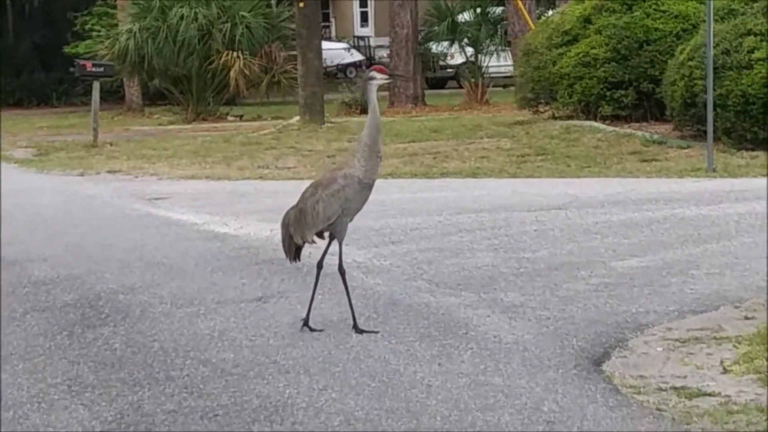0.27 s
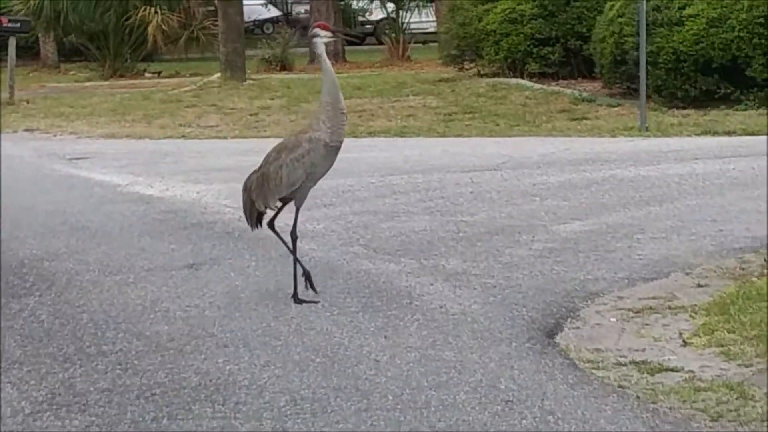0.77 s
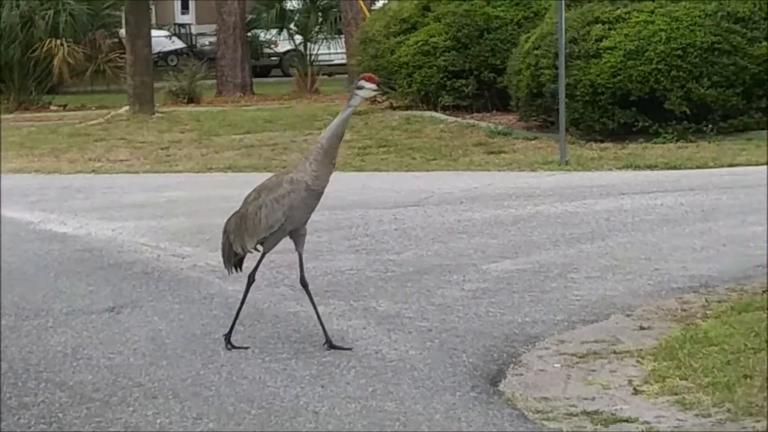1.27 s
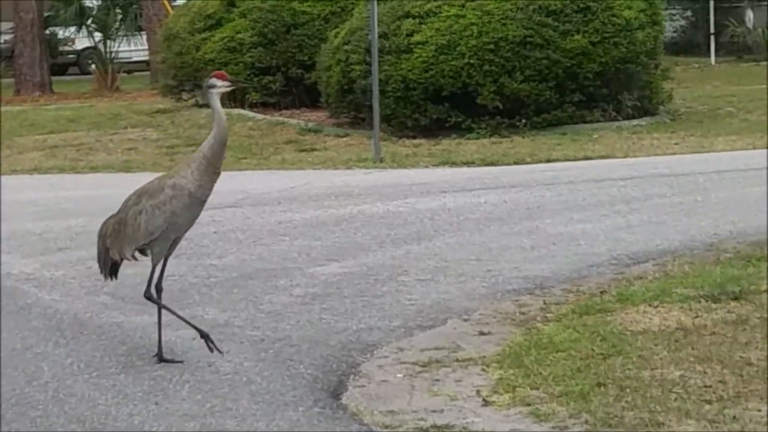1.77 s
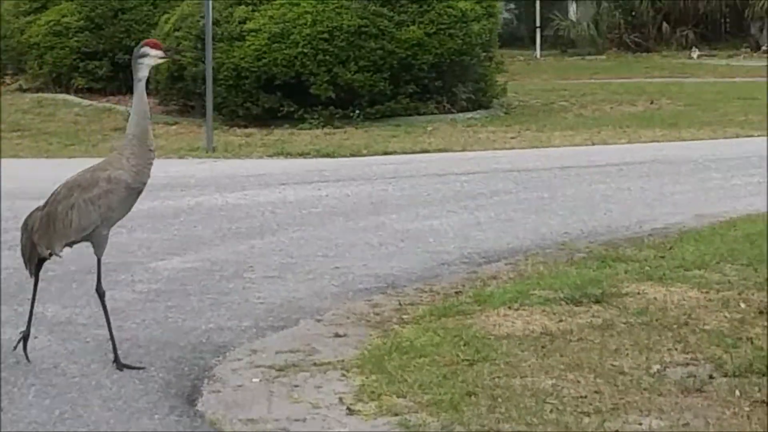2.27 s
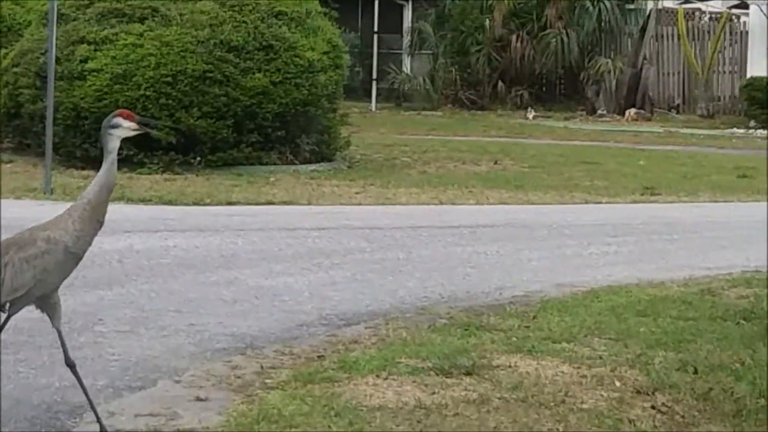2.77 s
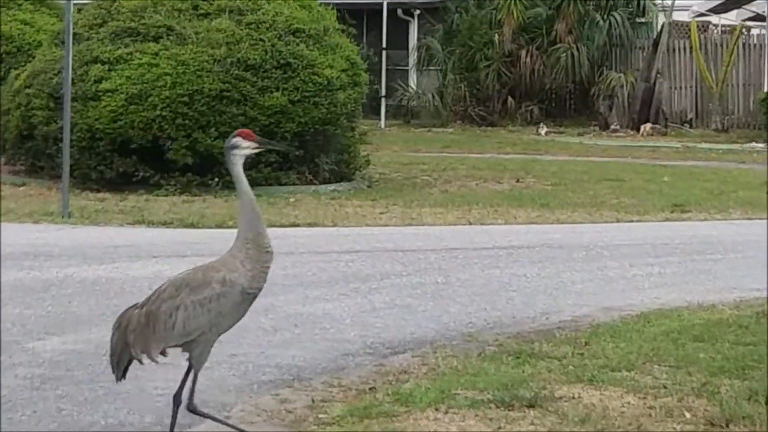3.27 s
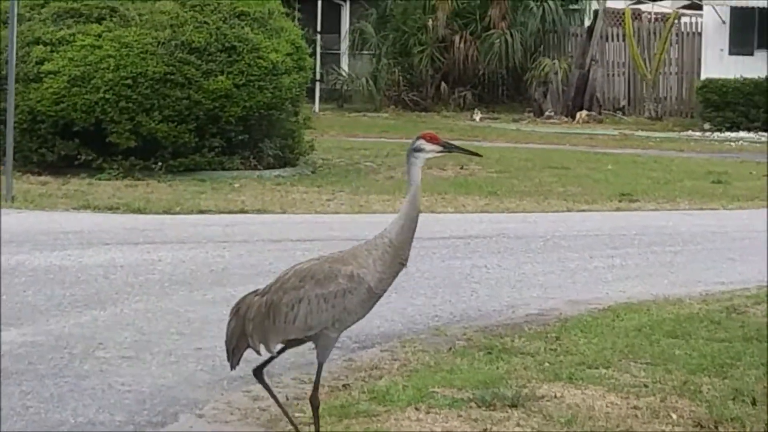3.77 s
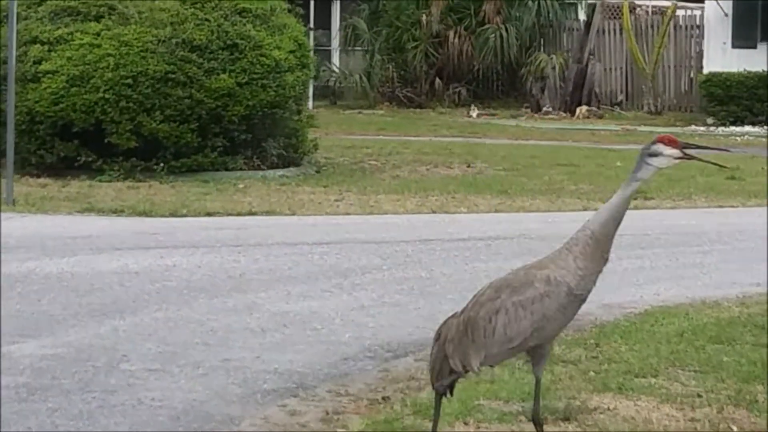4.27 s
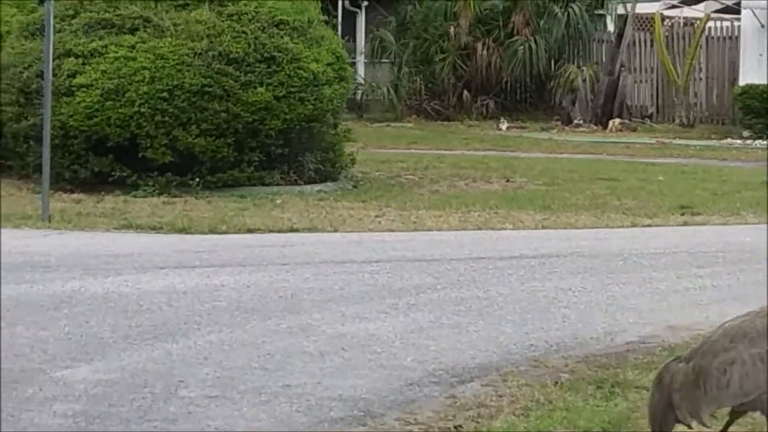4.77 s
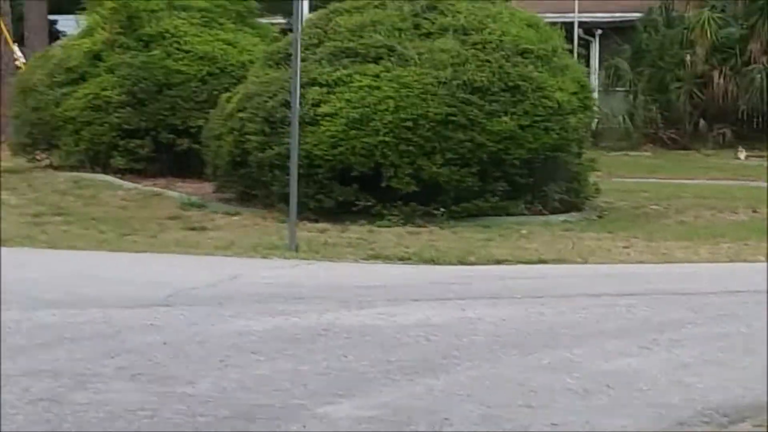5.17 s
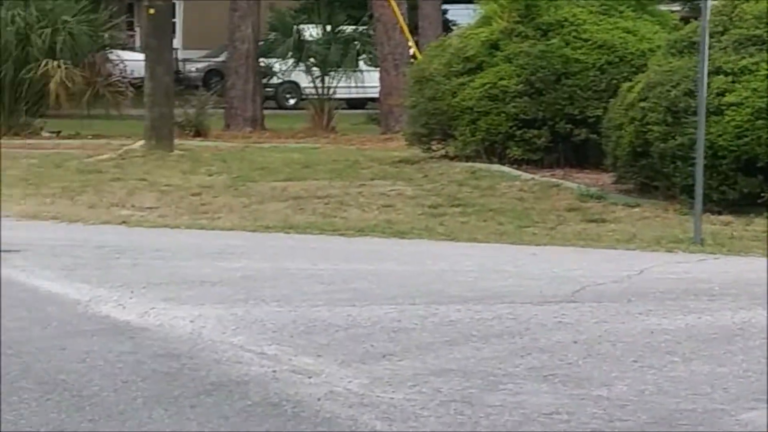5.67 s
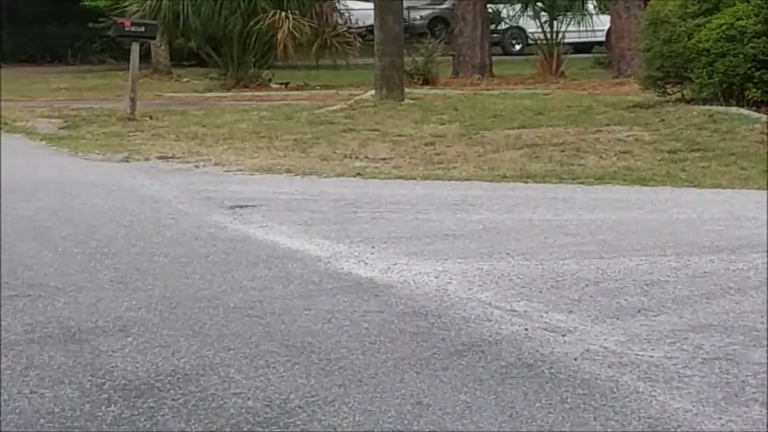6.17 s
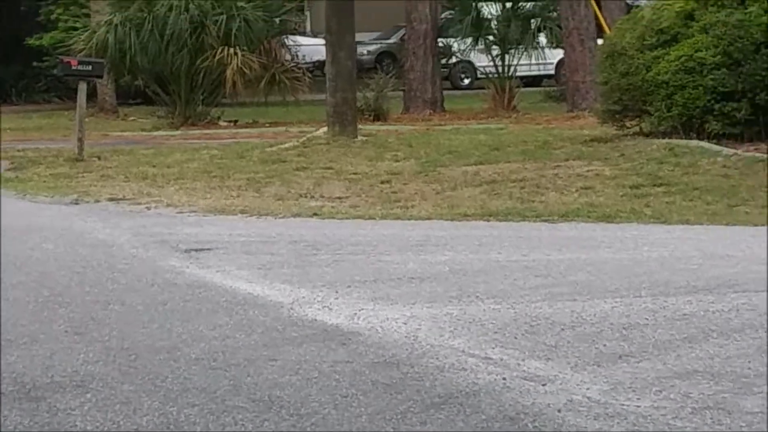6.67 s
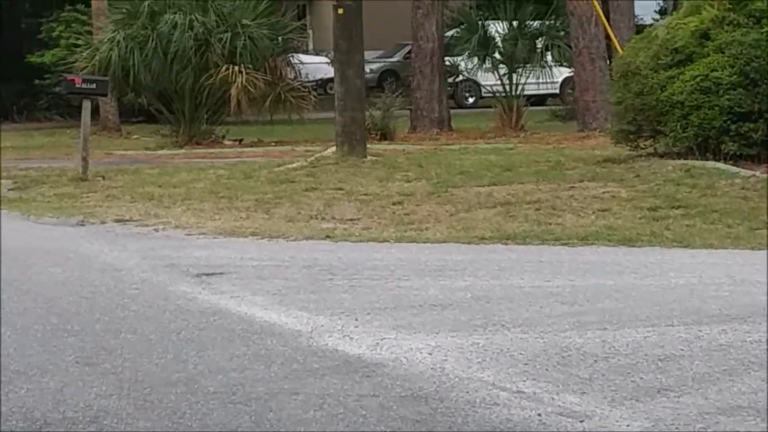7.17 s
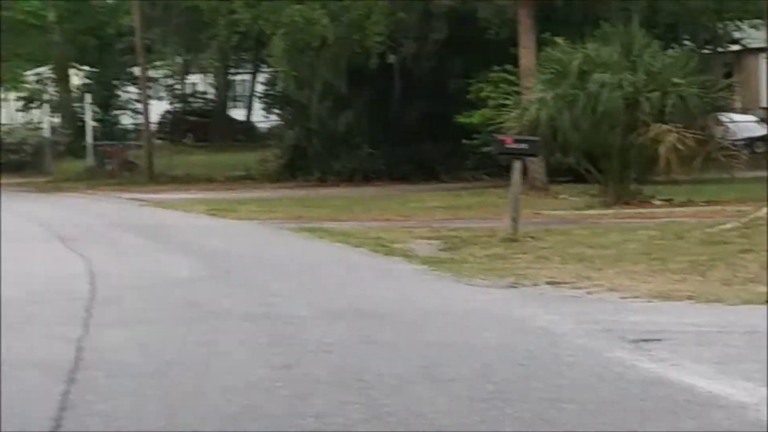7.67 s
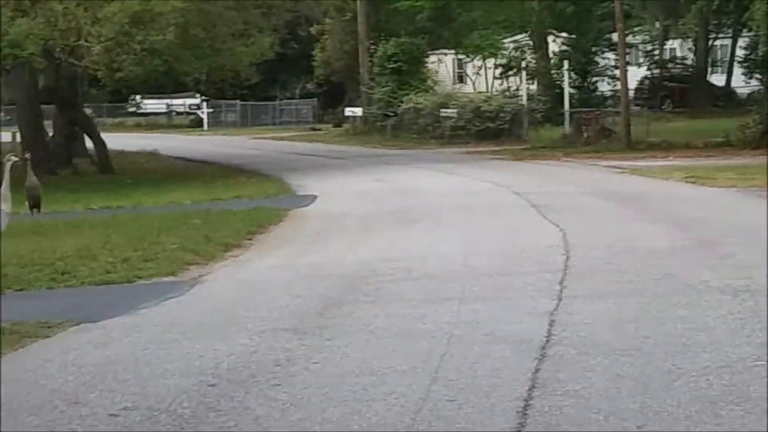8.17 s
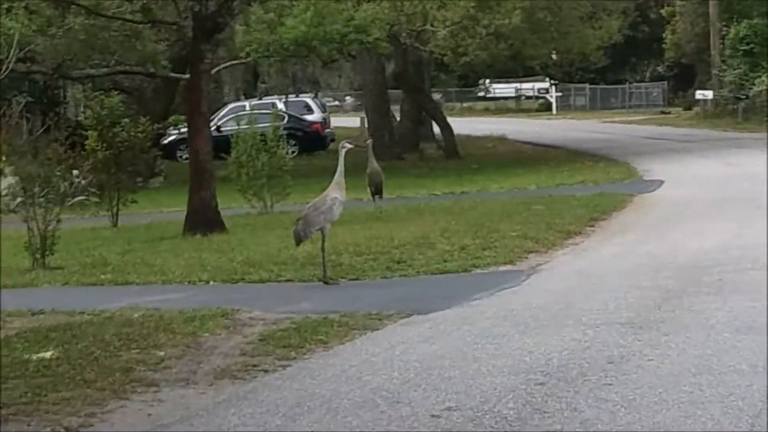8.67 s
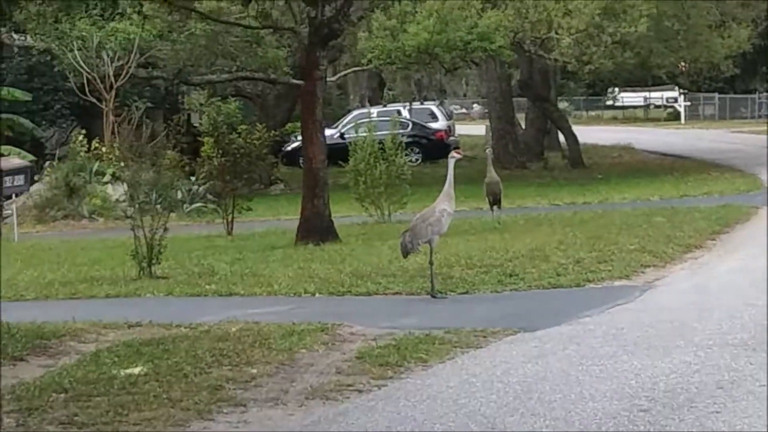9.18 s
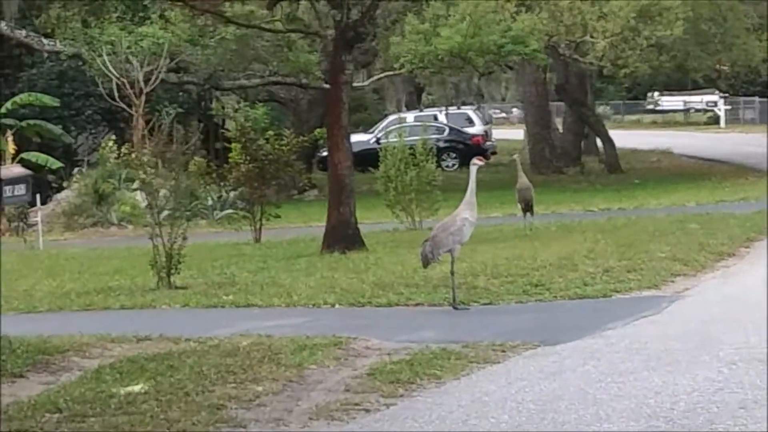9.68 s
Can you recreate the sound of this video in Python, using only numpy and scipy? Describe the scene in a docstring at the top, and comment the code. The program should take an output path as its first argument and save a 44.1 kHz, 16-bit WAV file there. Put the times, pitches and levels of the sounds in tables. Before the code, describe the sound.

A crane's hoarse toot and hard falling rattle repeats every couple of seconds outdoors, its mate's soft toot and rapid ticks leading in most rounds.

```python
"""Two sandhill cranes call in duet on a quiet street lined with trees and houses. The lead bird gives a loud toot
and a rattle of short falling pulses; its mate starts most rounds with a soft toot and a run of higher ticks.
Each voice is a buzz of membrane closures and turbulence, shaped by the throat and echoed by the street.
Small birds whistle far off as gliding sines, a distant engine drones over rumble and hiss in filtered noise,
wind puffs at the microphone near the end, and the loudest pulses overload it."""
import sys
import numpy as np
from scipy import signal
from scipy.fft import rfft, irfft, next_fast_len
from scipy.io import wavfile
from scipy.ndimage import map_coordinates

SR = 44100
rng = np.random.default_rng(int(sys.argv[2]) if len(sys.argv) > 2 else 0)


def waveform_to_disk(signal):
    """Save audio, clipped to [-1, 1], as 16-bit WAV at the path in sys.argv[1]."""
    frames = np.transpose(np.atleast_2d(signal))
    scaled = np.clip(frames, -1, 1) * 32767
    samples = np.round(scaled).astype(np.int16)
    wavfile.write(sys.argv[1], SR, samples)


N = 437031
TOP_HZ = 15850  # upper limit of the microphone


def undb(db):
    """Decibels to gain."""
    return 10 ** (np.asarray(db) / 20)


def level(x, db):
    """Set the rms level."""
    return x * undb(db) / np.sqrt(np.mean(x ** 2) + 1e-18)


def burst(x, db):
    """Set the level of a short sound: its energy spread over 10 ms."""
    return x * undb(db) / np.sqrt(np.sum(x ** 2) / (SR / 100) + 1e-18)


def add(out, start_s, x):
    """Mix x in from a time in seconds."""
    i = max(int(start_s * SR), 0)
    out[i:i + len(x)] += x[:max(len(out) - i, 0)]


def colour(x, points):
    """Causal filter through (Hz, dB) points, built from the cepstrum of its log gain."""
    size = 2 * next_fast_len(len(x))
    hz, db = np.transpose(points)
    bin_hz = np.arange(size // 2 + 1) * SR / size
    gain_db = np.interp(np.log(bin_hz + 1), np.log(hz), db)
    cepstrum = irfft(np.log(undb(gain_db)))
    # folding the cepstrum forward gives minimum phase
    cepstrum[1:size // 2] *= 2
    cepstrum[size // 2 + 1:] = 0
    return irfft(rfft(x, size) * np.exp(rfft(cepstrum)))[:len(x)]


def band(x, low_hz, high_hz):
    """Band-pass."""
    sos = signal.butter(3, [low_hz, min(high_hz, SR / 2 - 100)], "band", fs=SR, output="sos")
    return signal.sosfilt(sos, x)


def walk(rate, size):
    """Smooth random wander with a spread near 1, through `rate` random points a second."""
    steps = np.arange(size) * rate / SR
    points = rng.standard_normal(int(steps[-1]) + 2)
    return map_coordinates(points, [steps], order=2, mode="nearest")


def swell(t, attack_s, hold_s, decay_s):
    """A quick rise, a hold and a ringing decay."""
    rise = 1 - np.exp(-(t / attack_s) ** 2)
    return rise * np.exp(-np.maximum(t - hold_s, 0) / decay_s)


def delayed(x, lag_s):
    """The same sound a little later, cut to the same length."""
    return np.pad(x, (int(SR * lag_s), 0))[:len(x)]


def syrinx(hz, jitter, breathy):
    """Phase of the membranes and their buzz: a sharp closure each cycle, with a puff of turbulence."""
    phase = 2 * np.pi * np.cumsum(hz * (1 + jitter * walk(1029.4, len(hz)))) / SR
    k = np.arange(2, TOP_HZ // hz.min() + 1)[:, None]
    closures = np.sum(np.cos(k * phase) * (k * hz < SR / 2), axis=0)
    puffs = rng.standard_normal(len(hz)) * (1 + np.cos(phase)) ** 2
    return phase, level(closures, 0) + breathy * level(puffs, 0)


def bounce(x):
    """The road returns the treble a moment later, at a lag drawn at random for each sound."""
    return x + undb(-6.5) * delayed(x, rng.uniform(.0004, .0016))


def beats(start, end, quickening, count):
    """Times of a run that speeds up from start to end: the k-th gap is the first gap / k ** quickening."""
    elapsed = np.append(0, np.cumsum(np.arange(1, count) ** -quickening))
    return start + (end - start) * elapsed / elapsed[-1]


def street():
    """Impulse response: scattered echoes from hedges and trunks, then a long faint tail from the houses."""
    t = np.arange(SR * 3 // 2) / SR
    scatter = rng.standard_normal(len(t)) * undb(1.65 * rng.standard_normal(len(t)))
    near = scatter * swell(np.maximum(t - .008, 0), 0.00095, 0.053, 0.039)
    far = rng.standard_normal(len(t)) * undb(4.3 * walk(40.0, len(t))) * swell(t, 0.0057, 0.021, 0.15)
    near = colour(near, [(300, -4.5), (800, 1.5), (2500, 4), (8500, 6.5), (13000, 10.0)])
    far = colour(far, [(300, -5), (800, -8.0), (8500, -5.5), (12000, -10)])
    return undb(-7.5) * near / np.linalg.norm(near) + undb(-17) * far / np.linalg.norm(far)


def tick(db, bright_db, throat):
    """One pulse of the mate: higher and shorter than the lead bird's, with a hard buzz and a weaker rebound."""
    t = np.arange(SR // 30) / SR
    pitch = np.interp(t, [0, .009], [1290, 1020]) * (1 + 0.016 * rng.standard_normal())
    phase, buzz = syrinx(pitch, jitter=0.053, breathy=0.24)
    tone = np.sin(phase) * swell(t, 0.00032, 0.0035, 0.0086)
    edge = bounce(colour(buzz * swell(t, 0.00052, 0.002, 0.003), throat))
    one = burst(tone, db) + burst(edge, db + bright_db)
    return one + undb(-9.0) * delayed(one, rng.normal(.006, .0005))


# Colour of the mate's buzz at the microphone before it turns.
# Each row: frequency [Hz], relative gain [dB].
MATE_COLOUR = [(1900, -25), (2400, -16.5), (3200, 0), (3800, 0.5), (4250, 5.5), (5000, 0.5), (5450, -2),
               (6250, 5), (7000, 2.5), (8150, -5), (8700, 3.5), (9400, -16.5), (12800, -22.5),
               (15500, -23.5)]


def earlier_call(echoes):
    """The last tick of an earlier round still hangs among the trees: its echo, joined 1/8 s in."""
    return signal.fftconvolve(tick(-6.5, -6.5, MATE_COLOUR), echoes)[SR // 8:]


# Colour of the low rumble along the street. Each row: frequency [Hz], relative gain [dB].
RUMBLE_COLOUR = [(15, -59), (25, -7), (81, -8.5), (101, -4), (151, -13.5), (209, -8.5), (249, -15.5),
                 (400, -26.5), (520, -51), (880, -120)]
# Colour of the outdoor hiss. Each row: frequency [Hz], relative gain [dB].
HISS_COLOUR = [(180, -31), (300, -8.5), (462, -6.5), (494, 0.5), (528, -6), (774, -2.5), (1580, -2.5),
               (2030, -11), (4440, -21.5), (5340, -16), (6850, -20), (8090, -14.5), (12100, -38.5),
               (16000, -31)]
# Drones of the distant engine. Each row: pitch [Hz], level [dB] against the engine's level below.
ENGINE_DRONES = [(70, -4), (91, -5.5)]
# Level of the distant engine at the microphone. Each row: time in seconds [s], level [dB].
ENGINE_COURSE = [(0.0, -39.5), (1.35, -45.5), (1.88, -38.5), (4.18, -47), (6.06, -47), (6.69, -38),
                 (7.3, -41.5), (9.5, -39)]


def background():
    """Two wavering engine drones over a low rumble, a soft outdoor hiss, and a puff of wind on the microphone."""
    t = np.arange(N) / SR
    rumble = level(colour(rng.standard_normal(N), RUMBLE_COLOUR), -42.0) * undb(0.35 * walk(7.5, N))
    engine = np.zeros(N)
    engine_gain = undb(np.interp(t, *np.transpose(ENGINE_COURSE)))
    for hz, db in ENGINE_DRONES:
        phase = 2 * np.pi * np.cumsum(hz * (1 + 0.0404 * walk(13, N))) / SR
        engine += level(np.sin(phase) * undb(3.7 * walk(7.4, N)), db) * engine_gain
    hiss = level(colour(rng.standard_normal(N), HISS_COLOUR), -45.0) * undb(walk(2.78, N) / 2)
    gust = level(band(rng.standard_normal(N), 35, 108), -28.0) * np.exp(-np.abs(t - 9.79) / 0.084)
    return rumble + engine + hiss + gust


# Whistles of small birds far off. Each row: start in seconds [s], length [s], first, middle and last
# pitch [Hz], level [dB] before the lifts below and in the mix.
DISTANT_WHISTLES = [(0.57, 0.068, 7670, 8250, 7800, -59), (3.568, 0.06, 7700, 8250, 7750, -64),
                    (4.755, 0.056, 3000, 2750, 2400, -64), (4.945, 0.045, 8660, 8000, 7730, -59),
                    (5.116, .07, 2290, 2700, 3300, -61.5), (5.17, 0.058, 3200, 3450, 2490, -56),
                    (5.421, 0.07, 7270, 4130, 2350, -50.5), (6.389, 0.087, 7100, 4330, 2370, -51.5),
                    (6.649, 0.08, 7370, 4300, 2370, -52)]


def songbirds():
    """Thin distant whistles: slightly wavering sines that glide through three pitches."""
    out = np.zeros(N)
    for start, length, first_hz, middle_hz, last_hz, db in DISTANT_WHISTLES:
        u = np.linspace(0, 1, int(length * SR))
        glide = np.polyfit([0, .5, 1], [first_hz, middle_hz, last_hz], 2)
        hz = np.polyval(glide, u) * (1 + 0.015 * walk(344, len(u)))
        whistle = np.sin(np.pi * u) * np.sin(2 * np.pi * np.cumsum(hz) / SR)
        add(out, start, level(whistle, db + 11.5))
    return out


TURN_S, MATE_TURN_S = 3.3, 8.5  # when the lead crane turns, and when the mate turns
# Colour of the lead crane's buzz before it turns. Each row: frequency [Hz], relative gain [dB].
EARLY_COLOUR = [(1900, -24), (2500, -20.5), (3300, -5.5), (3900, -2), (4600, 5), (5400, -2.5),
                (6100, -12.5), (7400, -1.5), (7900, -9), (8500, 1), (9600, -14), (11500, -25)]
# Colour of either crane's buzz after it turns. Each row: frequency [Hz], relative gain [dB].
TURNED_COLOUR = [(1900, -42), (2400, -6.5), (3700, -2), (4600, 0.5), (5600, -3.5), (6450, 1.5),
                 (6950, -3.5), (8350, 2), (9200, -2.5), (9800, -13), (11500, -21.5)]


def lead_buzz(start):
    """The treble colour depends on which way the bill points."""
    return EARLY_COLOUR if start < TURN_S else TURNED_COLOUR


def toot(row, throat, rise, droop, rough):
    """A note that scoops up and arches in pitch; hoarse as it starts and stops, brightest in between."""
    _, length, top_hz, *harmonic_db, buzz_db = row
    u = np.linspace(0, 1, int(length * SR))
    scoop = 0.198 * np.exp(-u / 0.0577)
    climb = rise * np.maximum(1 - u / .66, 0) ** 1.31
    fall = droop * np.maximum(3 * u - 2, 0) ** 2
    pitch = top_hz * (1 - scoop - climb - fall)
    hoarse = rough * (.05 + (2 * u - 1) ** 4)
    phase, buzz = syrinx(pitch, jitter=0.056 * hoarse, breathy=1.2 * hoarse)
    effort = np.interp(u, [0, .05, .55, .9, 1], [0.2, 0.28, 0.87, 0.58, 0])
    tone = sum(level(effort * np.sin(k * phase), db) for k, db in enumerate(harmonic_db, 1))
    edge = bounce(band(colour(buzz * effort ** 2, throat), top_hz, 9500))
    return tone + level(edge, buzz_db)


# Toots of the lead crane. Each row: start in seconds [s], length [s], pitch at the top of the arch [Hz],
# levels of harmonics 1, 2 and 3 [dB], level of the buzz [dB], all levels before a common lift.
LEAD_TOOTS = [(0.845, 0.064, 589, -33, -27, -25, -26), (2.287, 0.08, 598, -32.5, -24.5, -27, -23),
              (3.939, 0.071, 598, -32.5, -23, -31.5, -26), (5.693, 0.067, 592, -28.5, -28, -22, -27.5),
              (7.128, .074, 598, -27.5, -31.5, -25.5, -28.5), (9.532, 0.074, 581.5, -34, -38, -37.5, -33)]
# Soft toots of the mate. Each row: start in seconds [s], pitch at the top of the arch [Hz], buzz level [dB].
MATE_TOOTS = [(1.901, 693, -35), (3.647, 687, -34.5), (5.403, 696, -32.5), (6.823, 703, -31.5),
              (9.248, 690, -37)]


def toots():
    """The opening notes of both cranes: three harmonics of the membranes under a shaped buzz."""
    out = np.zeros(N)
    for row in LEAD_TOOTS:
        note = toot(row, lead_buzz(row[0]), rise=.085, droop=0.06, rough=1.63)
        add(out, row[0], undb(5.5) * note)
    for start, top_hz, buzz_db in MATE_TOOTS:
        row = (start, .057, top_hz, -41, -37.5, -47, buzz_db)  # length in s, three harmonics in dB
        add(out, start, toot(row, MATE_COLOUR, rise=0.094, droop=0.0043, rough=0.52))
    return out


def flutter(hz, db):
    """The membranes flutter once just before they open fully."""
    t = np.arange(SR // 50) / SR
    return burst(np.sin(2 * np.pi * 1.016 * hz * t) * swell(t, 0.0012, 0, 0.00092), db - 19)


# As the air runs out, the pulses shorten and roughen; the lengths scale each part's hold.
FRESH_PULSE_S, SPENT_PULSE_S, SPENT_JITTER = .0068, .0032, .06
# Resonances of the long coiled windpipe. Each row: frequency [Hz], relative gain [dB].
PIPE_COLOUR = [(330, -58), (600, 4.5), (850, -1), (1150, -1), (1450, -3), (1760, 8), (2000, -9),
               (2400, -25), (4000, -55)]


def pulse(hz, glide, spent, tone_db, pipe_db, buzz_db, throat):
    """A few cycles that fall in pitch; the buzz stops first, the fundamental and the windpipe ring on."""
    t = np.arange(SR // 25) / SR
    length = FRESH_PULSE_S + (SPENT_PULSE_S - FRESH_PULSE_S) * spent
    # weak and late pulses are the hoarsest
    hoarse = np.interp(tone_db, [-15, -9], [.09, .02]) + SPENT_JITTER * spent ** 2
    pitch = hz * (.88 + 0.29 * glide * np.exp(-t / 0.00524))
    _, buzz = syrinx(pitch, jitter=0.026, breathy=1.0)
    slack_phase, rasp = syrinx(pitch, jitter=hoarse, breathy=1.65)
    tone = np.sin(slack_phase) * swell(t, 0.00046, 1.19 * length, 0.0079)
    pipe = colour(rasp * swell(t, 0.00055, 1.78 * length, 0.011), PIPE_COLOUR)
    edge = bounce(colour(buzz * swell(t, 0.00065, 0.21 * length, 0.0051), throat))
    return burst(band(tone, 415, 4000), tone_db) + burst(pipe, pipe_db) + burst(edge, buzz_db)


def snap(db, throat):
    """A brief second closure of the membranes that rings the windpipe."""
    t = np.arange(SR // 25) / SR
    _, buzz = syrinx(np.full(len(t), 850.), jitter=0.036, breathy=1.0)
    buzz = buzz * swell(t, 0.00072, 0.00073, 0.0032)
    return burst(colour(buzz, throat), db) + burst(colour(buzz, PIPE_COLOUR), db + 0.5)


RATTLE_QUICKENING = .18
# as the air runs out, the pulses sink toward this reference pitch, weaken and dull
SPENT_HZ, SPENT_TONE_DB, SPENT_TOP_DB = 779, -2.2, -17
FIRST_BUZZ_DB = -3  # the first pulse buzzes less
DYING_GAP_S, DYING_PULSE_DB = .053, -19.5  # one feeble pulse trails each rattle
# no two pulses are alike (pitch and glide as fractions)
PITCH_SCATTER, GLIDE_SCATTER, LEVEL_SCATTER_DB = .018, .18, .8
# the membranes snap shut once more after each pulse, harder as they slacken (dB against the rattle's buzz)
SNAP_LAG_S, SNAP_SCATTER_S, FRESH_SNAP_DB, SPENT_SNAP_DB = .0125, .001, -17, -14.5
# Rattles of the lead crane. Each row: start in seconds [s], end [s], pulse count, reference pitch of the
# first pulse [Hz] (each pulse falls from above its reference to below), fundamental level [dB],
# windpipe level [dB], buzz level [dB], sag of the buzz by the end [dB].
LEAD_RATTLES = [(0.9823, 1.485, 10, 934.4, -15.5, -14.5, -10.5, -7.5),
                (2.4366, 2.832, 8, 932.3, -12, -17.5, -12.5, -6.5),
                (4.0816, 4.571, 10, 872.3, -8.5, -24, -14.5, -10),
                (5.8347, 6.274, 9, 880.3, -8, -16, -14.5, -5.5),
                (7.2715, 7.666, 8, 876.4, -8, -18, -15, -8),
                (9.6686, 10.116, 9, 836.3, -13.5, -19, -12, -6)]


def rattle():
    """Each rattle is one lungful: quickening pulses that hold their strength at first and sag toward the end."""
    out = np.zeros(N)
    for start, end, count, first_hz, tone_db, pipe_db, buzz_db, sag_db in LEAD_RATTLES:
        count = round(count)
        chance = rng.standard_normal((count + 1, 4))
        times = [*beats(start, end, RATTLE_QUICKENING, count), end + DYING_GAP_S]
        for k, s in enumerate(times):
            spent = min(k / (count - 1), 1) ** 2.12
            hz = (first_hz + (SPENT_HZ - first_hz) * spent) * (1 + PITCH_SCATTER * chance[k, 0])
            glide = 1 + GLIDE_SCATTER * chance[k, 3]
            push = LEVEL_SCATTER_DB * chance[k, 1] + DYING_PULSE_DB * (k == count)
            body = push + SPENT_TONE_DB * spent ** 2
            edge = push + sag_db * spent + FIRST_BUZZ_DB * (k == 0)
            # only the points above 10 kHz dull
            throat = [(f, db + SPENT_TOP_DB * spent * (f > 10000)) for f, db in lead_buzz(start)]
            add(out, s - .005, flutter(hz, tone_db + body))
            add(out, s, pulse(hz, glide, spent, tone_db + body, pipe_db + body, buzz_db + edge, throat))
            snap_db = buzz_db + push + FRESH_SNAP_DB + (SPENT_SNAP_DB - FRESH_SNAP_DB) * spent
            snap_lag = SNAP_LAG_S + SNAP_SCATTER_S * chance[k, 2]
            add(out, s + snap_lag, snap(snap_db, throat))
    return out


TICK_COUNT, TICK_QUICKENING, LAST_TICK_DB = 6, .195, -3.5
# Runs of ticks of the mate. Each row: start in seconds [s], end [s], level of the fundamental [dB],
# buzz over the fundamental [dB].
MATE_TICKS = [(2.018, 2.301, -20.5, 1.5), (3.7713, 4.049, -20.5, 2), (5.521, 5.798, -19.5, 1),
              (6.9485, 7.217, -19.5, 1.5), (9.3669, 9.642, -17.5, -4.5)]


def ticks():
    """The mate's quickening runs, each ending weaker; the last run has a weaker buzz and the turned colour."""
    out = np.zeros(N)
    for start, end, db, bright_db in MATE_TICKS:
        throat = MATE_COLOUR if start < MATE_TURN_S else TURNED_COLOUR
        for k, s in enumerate(beats(start, end, TICK_QUICKENING, TICK_COUNT), 1):
            add(out, s, tick(db + LAST_TICK_DB * (k == TICK_COUNT), bright_db, throat))
    return out


# Level of two treble bands of the calls over time. Each row: time in seconds [s],
# change around 10 kHz [dB], change above 11 kHz [dB].
TREBLE_COURSE = [(1.2, -5, -5), (2.2, -6, 11), (2.5, 0.5, -2), (3.8, -2, -1), (4.2, 1, 5.5), (6.2, -1, 7),
                 (6.9, 8.5, -2), (7.6, 5.5, -8), (9.4, 5, -8), (9.7, -5, -10)]


def beam(x):
    """The highest treble leaves the bill in a narrow beam; its two bands rise and fall from call to call."""
    high = signal.sosfiltfilt(signal.butter(3, [9200, 11000], "band", fs=SR, output="sos"), x)
    top = signal.sosfiltfilt(signal.butter(6, 11000, "high", fs=SR, output="sos"), x)
    t = np.arange(N) / SR
    times, high_db, top_db = np.transpose(TREBLE_COURSE)
    high_change = undb(np.interp(t, times, high_db)) - 1
    top_change = undb(np.interp(t, times, top_db)) - 1
    return x + high_change * high + top_change * top


def scene():
    """The duet and the songbirds sound through the street, over the background."""
    echoes = street()
    cranes = beam(rattle() + ticks() + toots())
    birds = songbirds()
    direct = cranes + undb(-1.5) * birds
    # the distant birds send more of their sound by way of the echoes
    reflected = signal.fftconvolve(cranes + 1.8 * birds, echoes)[:N]
    out = direct + reflected + background()
    add(out, 0, earlier_call(echoes))
    return out[None]


def record(dry):
    """The microphone drops the deepest bass and flattens the loudest peaks, and the top is cut."""
    ceiling = 0.63
    dry = signal.sosfilt(signal.butter(4, 36, "high", fs=SR, output="sos"), dry)
    squeezed = dry / (1 + (dry / ceiling) ** 6) ** (1 / 6)
    return signal.sosfilt(signal.ellip(10, .2, 70, TOP_HZ, fs=SR, output="sos"), squeezed)


dry = scene()
out = record(dry)
waveform_to_disk(out)
```